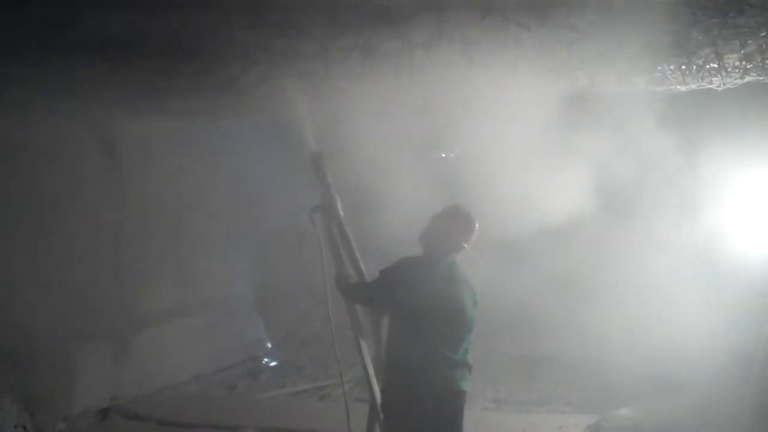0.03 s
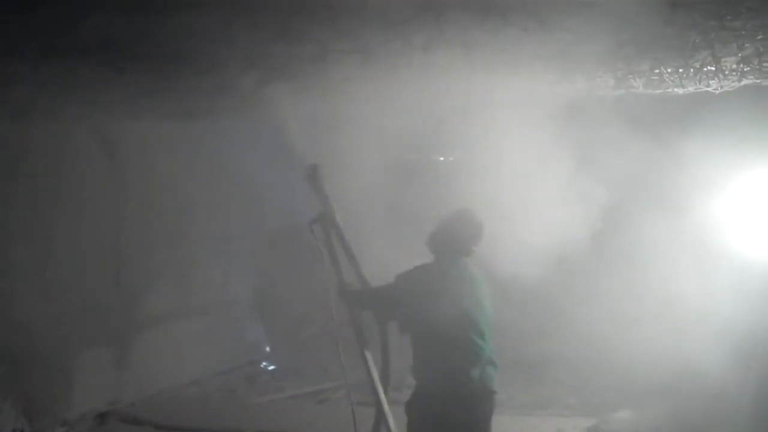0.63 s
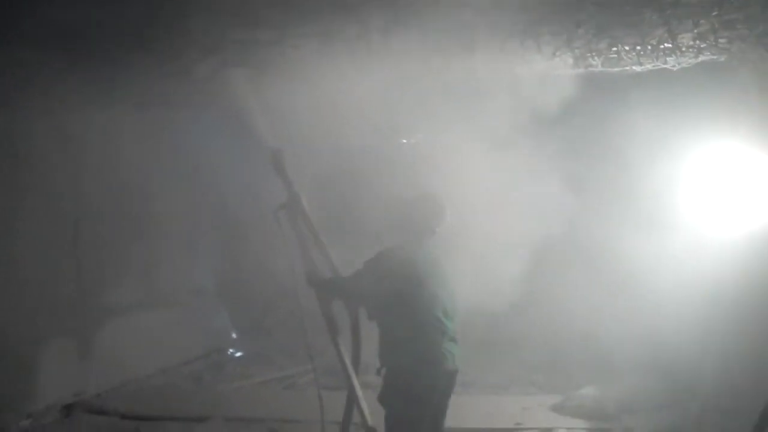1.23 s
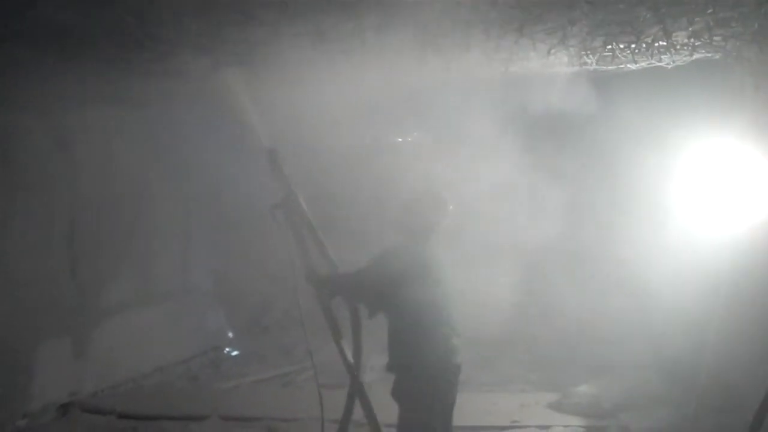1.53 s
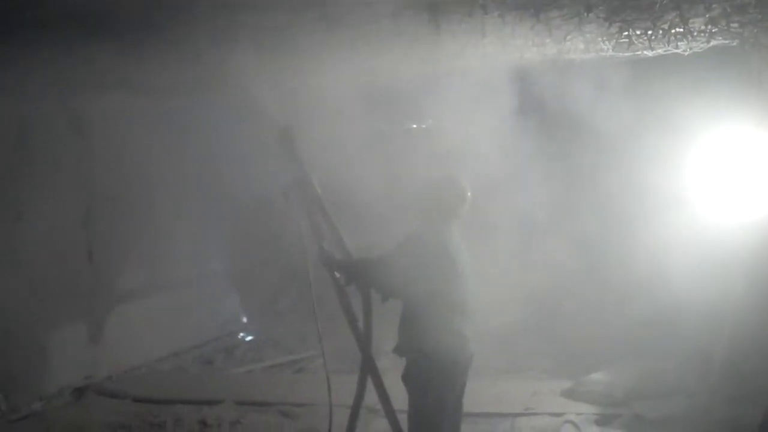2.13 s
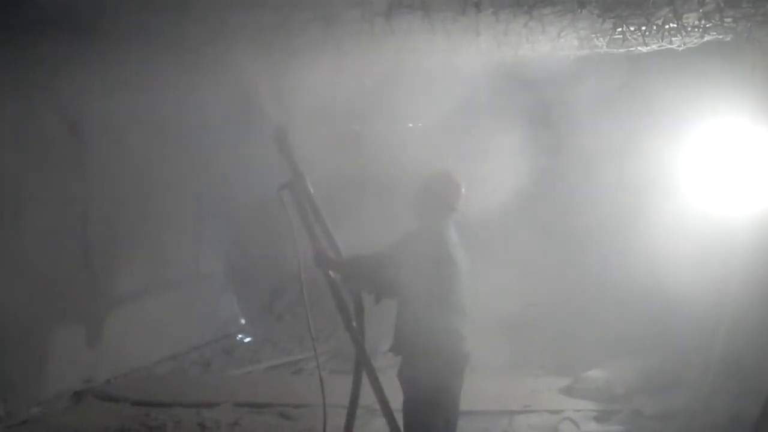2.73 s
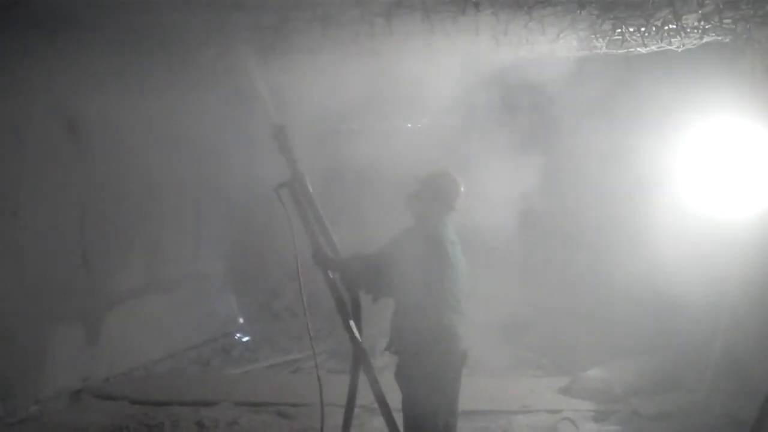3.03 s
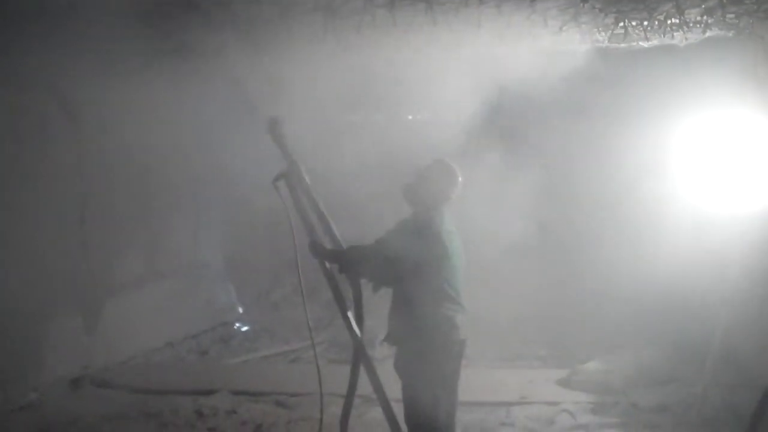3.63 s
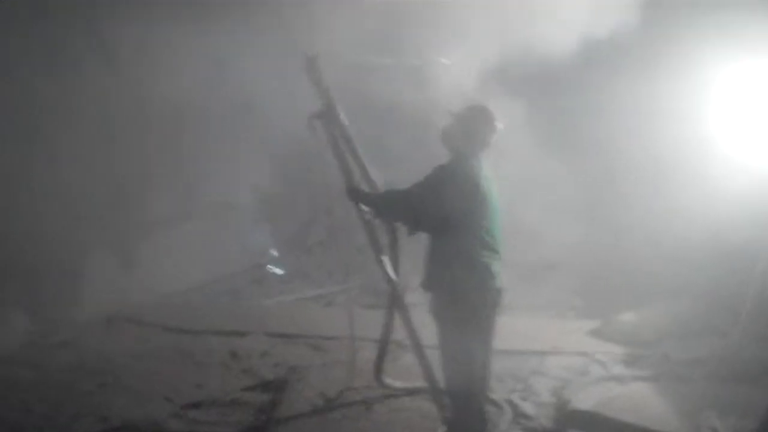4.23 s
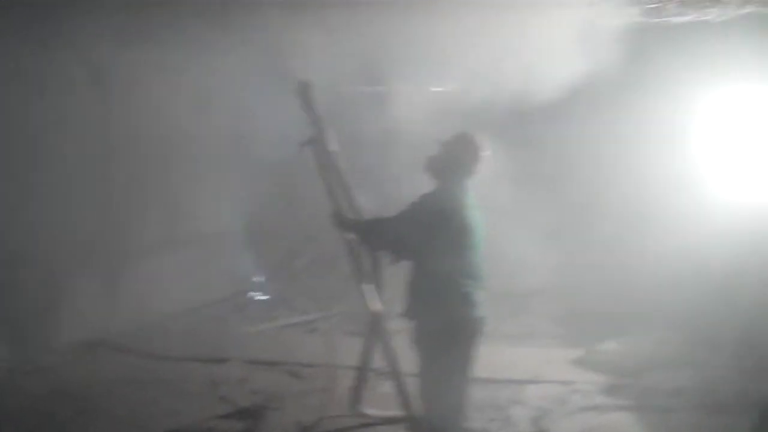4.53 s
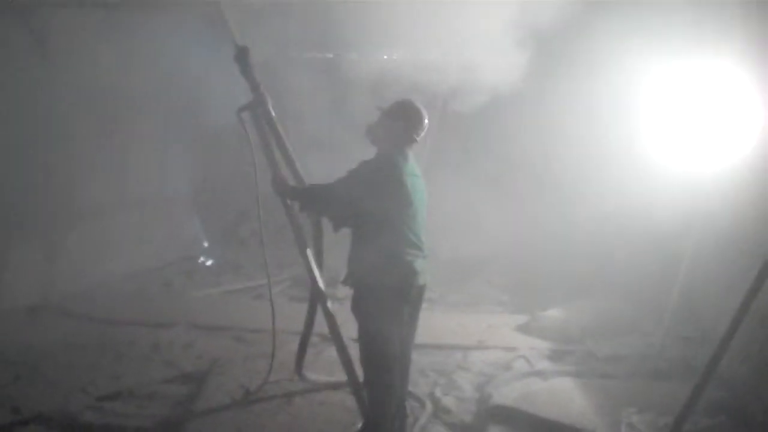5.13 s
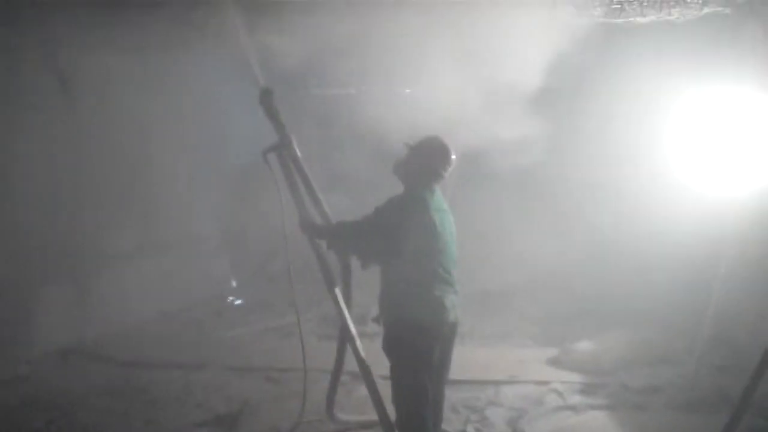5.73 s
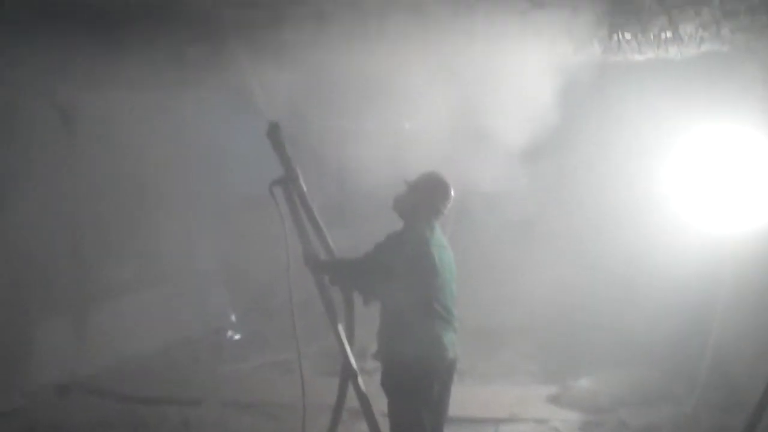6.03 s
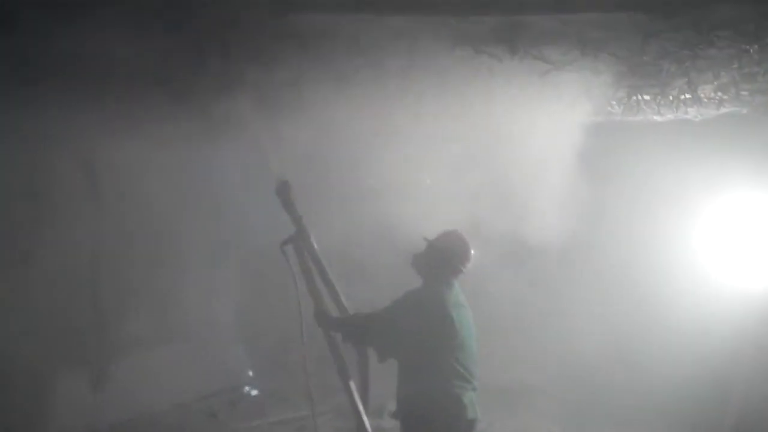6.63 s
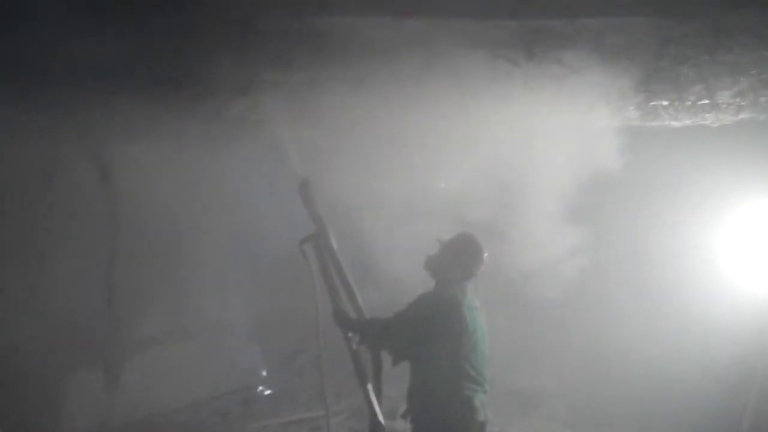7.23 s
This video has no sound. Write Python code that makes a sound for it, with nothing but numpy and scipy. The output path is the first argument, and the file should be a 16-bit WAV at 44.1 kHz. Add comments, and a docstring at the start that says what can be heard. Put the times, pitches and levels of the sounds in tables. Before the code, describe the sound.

A compressed-air nozzle sprays wet concrete inside a rock tunnel, making a loud, unbroken roar and hiss. The jet surges unevenly and spits now and then, and its hollow tone shifts four times as the nozzle is aimed anew. Splatter and fine grit pepper the roof while the tunnel booms behind. The stereo microphones are close, briefly ruffled by a faint draught early on.

```python
"""Spraying concrete in a tunnel

Inside a rock tunnel, a stereo pair stands near enough to hear grit pepper the roof as a worker
sprays wet concrete from a compressed-air lance. The jet roars and surges as the mix comes through
unevenly, and its hollow colour shifts each time the lance is aimed anew. The tunnel booms behind it,
and a draught briefly ruffles the microphones."""
import sys
import numpy as np
from scipy import signal
from scipy.fft import rfft, irfft, next_fast_len
from scipy.io import wavfile
from scipy.ndimage import uniform_filter1d, map_coordinates

SR = 44100
rng = np.random.default_rng(int(sys.argv[2]) if len(sys.argv) > 2 else 0)


def wav_record(signal):
    """Record a signal, one row per channel, as 16-bit PCM in the file named by sys.argv[1]."""
    frames = np.transpose(np.atleast_2d(signal))
    bounded = np.clip(frames, -1, 1)
    # unit amplitude maps onto the largest positive 16-bit level
    quanta = np.round(bounded * 32767).astype(np.int16)
    wavfile.write(sys.argv[1], SR, quanta)


N = 330309
TIME = np.arange(N) / SR
FFT_SIZE = next_fast_len(N + 8192)
FREQ = np.fft.rfftfreq(FFT_SIZE, 1 / SR)

# each layer's spectrum at the microphones: (frequency [Hz], relative density [dB])
DRAUGHT_SPECTRUM = [(15, -5), (35, 0), (65, 2), (100, -9), (250, -41)]
BOOM_SPECTRUM = [(25, -8), (60, -17), (90, -9.5), (130, -5), (170, -5), (250, -3), (320, -1.5), (390, -2),
                 (460, -1), (560, -3.5), (800, -14), (1500, -43)]
SPLASH_SPECTRUM = [(300, -22.5), (560, -2), (750, 0), (900, 0.5), (1100, 0.5), (1400, 2), (1700, -1),
                   (2600, -8), (5000, -33.5)]
HISS_SPECTRUM = [(2500, -24), (4000, 1.5), (5200, 0.5), (6500, -1), (8000, -4.5), (10000, -9.5),
                 (11200, -15), (12200, -22.5), (14000, -63)]
ROAR_SPECTRUM = [(600, -26.5), (1100, -17), (1700, -2.5), (2500, -1.5), (3300, -1.64), (4700, -7),
                 (5500, -9.5), (6500, -20.5), (10000, -46)]
# gusts of displaced air: (peak time [s], length [s], rise [dB])
GUSTS = [(.3, .5, 4), (1.45, 0.56, 9), (2.0, .4, 13)]
# resonances of the tunnel and its roof: (frequency [Hz], width [Hz], relative strength [dB])
ROCK_MODES = [(184, 31, 0.5), (256, 51, 3.0), (474, 102, 3.5), (655, 130, 2.0), (741, 50, 6.0),
              (819, 91, 7.0), (965, 90, 8.5), (1061, 83, 9.0), (1147, 120, 6.5), (1271, 96, 7.5),
              (1341, 103, 7.5), (1448, 55, 2.5), (1729, 53, 1.0)]
# resonances between nozzle and rock, by aim: (frequency [Hz], width [Hz], relative strength [dB])
AIM_1_MODES = [(1476, 117, 4.5), (1580, 170, 4.5), (1750, 110, 6.0), (1960, 220, 2.5), (2238, 44, 3.5),
               (2639, 145, 4.5), (2986, 170, 4.0), (3430, 100, 6.0), (3686, 170, -0.5), (4178, 117, 3.0)]
AIM_2_MODES = [(1578, 75, 3.5), (1901, 65, 7.0), (2074, 170, -1.0), (2295, 170, 1.5), (2375, 25, 3.5),
               (2579, 112, 7.5), (2945, 149, 2.0), (3305, 101, 1.0), (3553, 33, 6.5), (4107, 87, 3.5)]
AIM_3_MODES = [(1565, 124, 4.0), (1899, 70, 6.5), (2107, 160, 2.0), (2247, 60, 3.5), (2333, 57, 3.0),
               (2561, 170, 6.5), (2912, 144, 4.5), (3030, 25, 2.0), (3280, 64, 3.5), (3708, 84, 0.5),
               (4088, 88, 0.5)]
AIM_4_MODES = [(1523, 64, 9.5), (1589, 116, 8.5), (1885, 98, 5.0), (1996, 170, 7.0), (2272, 119, 7.5),
               (2518, 158, 0.0), (2755, 113, 2.5), (2903, 58, 2.5), (3106, 105, 3.0), (3534, 139, 2.0),
               (3821, 119, 5.0)]
AIM_5_MODES = [(1527, 27, 12.0), (1599, 170, 6.0), (1971, 133, 4.5), (2282, 54, 3.5), (2486, 107, 7.5),
               (2785, 67, 5.0), (2895, 128, 2.0), (3286, 25, 2.0), (3689, 93, -1.5), (4004, 110, 0.0)]
# the middle of each swing of the lance to its next aim: (time [s])
SWING_TIMES = [1.6, 3.1, 4.58, 6.12]
# slow rise and fall of the mix through the hose: (time [s], flow [dB])
HOSE_FLOW = [(0.0, 0.5), (0.3, -0.5), (0.75, -1.0), (1.1, -2.5), (1.4, -2.7), (1.65, 3), (2.2, 3.5),
             (2.65, 0.5), (3.1, -1.6), (3.4, 1.2), (4.05, -1.2), (4.6, 1), (5.25, -0.5), (5.5, 2.7),
             (5.75, -3), (6.1, -2.5), (6.5, 0.3), (7.49, 0)]
# uneven lumps of air and mix: (peak time [s], length [s], surge at nozzle [dB], surge at roof [dB])
HOSE_SURGES = [(0.113, 0.16, 2.5, 1.7), (0.253, 0.15, 4.9, 4.5), (0.575, 0.25, 4.5, 0.5),
               (0.84, 0.091, 6.5, 3.9), (0.944, 0.11, 5.5, 2.3), (1.166, 0.032, 4, -3), (1.256, 0.18, 5, 1),
               (1.701, 0.045, -0.2, 4), (2.179, 0.16, 1.5, 1), (2.43, 0.06, 2.2, 2.2),
               (2.556, 0.097, 5.5, 3.5), (2.886, 0.28, 4, -0.7), (3.127, 0.063, 4.4, 1.5),
               (3.27, 0.17, 2.6, 3), (3.604, 0.13, 5.5, 2), (3.879, 0.09, 2.3, -2.5), (4.32, 0.22, 3, 3.5),
               (4.436, 0.085, 3.5, 1), (4.523, 0.05, 3.5, 1), (4.66, 0.32, 3.0, 2.5),
               (4.838, 0.22, 3.3, 1.5), (5.08, 0.18, 2.5, 3.5), (5.36, 0.13, 0.6, 2.2),
               (5.613, 0.1, 5.5, 4.5), (5.775, 0.22, 1.5, 0.5), (5.97, 0.45, 2.5, 1.2),
               (6.364, 0.16, 3, 2.5), (6.896, 0.11, 3.5, 1.5), (7.395, 0.12, 2.3, 0)]
# brief starvings of the nozzle: (time [s], length [s], drop in feed [dB])
FEED_GAPS = [(0.426, 0.064, 1.5), (1.1, .1, 2), (1.39, 0.11, 0.5), (2.508, .04, 2.5), (2.73, .07, 1),
             (3.765, .07, 0.5), (4.007, 0.078, 0.5), (5.255, .07, 1)]
# slugs of mix leaving the nozzle: (peak time [s], level [dB], length [s], centre [Hz], half-width [ln Hz])
MIX_SLUGS = [(.84, -22, 0.08, 4200, 0.27), (.928, -19.5, 0.063, 4850, 0.35), (2.13, -28, .16, 3200, .3),
             (2.552, -20, .04, 2920, 0.7), (2.864, -20.5, .1, 2220, 0.11), (3.607, -26, 0.046, 3600, 0.6),
             (6.878, -26, 0.097, 2500, 0.1)]
# how alike the two microphones sound: (frequency [Hz], coherence [0-1])
PAIR_COHERENCE = [(30, .33), (70, .55), (140, .98), (400, .975), (700, .92), (1200, .84), (2000, .76),
                  (3100, .71), (5000, .43), (8000, .35), (13000, .3)]
# phase across the pair: (frequency [Hz], lead of left [rad])
PAIR_LEAD = [(2000, 0), (3700, -0.8), (5200, 1.14), (6600, 1.5), (8700, 1.24), (12000, 2.5)]
# balance across the pair: (frequency [Hz], left minus right [dB])
PAIR_BALANCE = [(100, -1.9), (450, -2.6), (850, -2.5), (1000, -1), (1400, -2.3), (2000, -1.5), (3200, -1.3),
                (5000, -2.5), (7000, -4.2), (9000, -7.5), (10500, -9), (12500, 0)]


def amp(db):
    """Decibels to gain."""
    return 10 ** (np.asarray(db) / 20)


def unit(x):
    """Scale to rms 1."""
    return x / np.sqrt(np.mean(x ** 2) + 1e-20)


def along(points):
    """Join (frequency [Hz], value) points on a log frequency axis."""
    hz, value = np.transpose(points)
    return np.interp(np.log(FREQ + 1), np.log(hz), value)


def filtered(x, response):
    """Apply a frequency response to x."""
    return irfft(rfft(x, FFT_SIZE) * response, FFT_SIZE)[..., :N]


def wobble(per_s):
    """A smooth random curve with per_s knots a second."""
    return map_coordinates(rng.standard_normal(int(N * per_s / SR) + 4), [TIME * per_s])


def swell(peak_s, length_s, attack_share=0.42, squareness=2.2):
    """A bell-like hump of height 1 that rises faster than it falls."""
    offset = (TIME - peak_s) / length_s
    share = np.where(offset < 0, attack_share, 1 - attack_share)
    return np.exp(-np.abs(offset / share) ** squareness)


def turbulence(patchy_db):
    """Two noises whose narrow bands swell and fade as eddies pass."""
    bands = signal.stft(rng.standard_normal((2, N)), nperseg=1024)[2]
    eddies = uniform_filter1d(rng.standard_normal(bands.shape[1:]), size=2, axis=0)  # across frequency
    eddies = uniform_filter1d(eddies, size=24, axis=1)  # across time
    return signal.istft(bands * amp(patchy_db * unit(eddies)), nperseg=1024)[1][:, :N]


def ringing(modes, ring_db):
    """Gain of resonances that stand above a flat bed."""
    peaks = sum(amp(db + ring_db) ** 2 / (1 + (2 * (FREQ - hz) / width) ** 2) ** 2
                for hz, width, db in modes)
    return np.sqrt(1 + peaks)


def walls(t60_s, wet_db):
    """Direct sound plus dense wall echoes, heard as a fine ripple on the spectrum."""
    tail = rng.standard_normal(N) * amp(-60 * TIME / t60_s)
    return np.abs(1 + amp(wet_db) * rfft(tail / np.linalg.norm(tail), FFT_SIZE))


def at_mics(noises, colour):
    """Colour two unrelated signals and spread them over the pair, at rms 1."""
    spread = np.arccos(np.clip(along(PAIR_COHERENCE), -1, 1)) / 2
    mid, side = filtered(noises, colour * np.array([np.cos(spread), np.sin(spread)]))
    return unit(np.array([mid + side, mid - side]))


def hose_feed():
    """What the hose delivers, in dB: slow flow, surges and gaps at the nozzle, surges at the roof."""
    flow_db = np.interp(TIME, *np.transpose(HOSE_FLOW))
    nozzle_db = sum(db * swell(s, length) for s, length, db, _ in HOSE_SURGES)
    landing_db = sum(db * swell(s, length) for s, length, _, db in HOSE_SURGES)
    starved_db = sum(db * swell(s, length) for s, length, db in FEED_GAPS)
    return flow_db, nozzle_db - starved_db, landing_db


def draught():
    """Displaced air ruffles the microphones, harder in gusts."""
    gust_db = sum(db * swell(s, length) for s, length, db in GUSTS)
    flutter_db = 1.5 * wobble(per_s=11)
    rumble = at_mics(turbulence(patchy_db=3.5), amp(along(DRAUGHT_SPECTRUM)))
    return amp(-55 + gust_db + flutter_db) * rumble


def tunnel_boom(flow_db, surge_db):
    """All around the pair, the tunnel booms with the spray."""
    colour = amp(along(BOOM_SPECTRUM)) * ringing(ROCK_MODES, ring_db=-0.5)
    boom = at_mics(turbulence(patchy_db=1.5), colour)
    return amp(-36 + flow_db + 0.44 * surge_db) * boom


def roof_splash(flow_db, surge_db):
    """Overhead, the mix lands on the rock in clots, with countless ticks of grit."""
    colour = amp(along(SPLASH_SPECTRUM)) * ringing(ROCK_MODES, ring_db=-2.5)
    splash = at_mics(turbulence(patchy_db=1), colour * walls(t60_s=0.76, wet_db=-2.5))
    ticks = rng.standard_normal((2, N)) * (rng.random(N) < 1200 / SR)  # about 1200 a second
    grit = at_mics(ticks, amp(along(ROAR_SPECTRUM)) + amp(along(HISS_SPECTRUM) - 14))
    clots_db = 0.96 * wobble(per_s=30)
    return amp(-25.5 + 0.6 * flow_db + 0.71 * surge_db + clots_db) * (splash + amp(-11.5) * grit)


def slugs(top_hz=10700):
    """Slugs of mix clear the nozzle, each a quick spit of noise that dies more slowly."""
    spits = np.zeros((2, N))
    lowpass = 1 / np.sqrt(1 + (FREQ / top_hz) ** 24)
    for peak_s, db, length, hz, width in MIX_SLUGS:
        age = np.maximum(1 + 2 * (TIME - peak_s) / length, 0)  # 0 at the onset, 1 at the peak
        envelope = (age * np.exp(1 - age)) ** 2
        band = 1 / np.sqrt(1 + (np.log((FREQ + 1) / hz) / width) ** 6)
        spits += amp(db) * envelope * at_mics(rng.standard_normal((2, N)), band * lowpass)
    return spits


def jet(flow_db, surge_db, swing_s=0.28):
    """Air tears out of the nozzle; each aim of the lance has its own resonances and wall colour."""
    air = turbulence(patchy_db=1.82)
    colours = [ringing(ROCK_MODES + modes, ring_db=1.0) * walls(t60_s=0.49, wet_db=-5.5)
               for modes in (AIM_1_MODES, AIM_2_MODES, AIM_3_MODES, AIM_4_MODES, AIM_5_MODES)]
    roar, *later_roars = [at_mics(air, amp(along(ROAR_SPECTRUM)) * colour) for colour in colours]
    for s, next_roar in zip(SWING_TIMES, later_roars):
        swung = np.clip(0.5 + (TIME - s) / swing_s, 0, 1)
        roar = (1 - swung) * roar + swung * next_roar
    hiss = at_mics(turbulence(patchy_db=1), amp(along(HISS_SPECTRUM)) * walls(t60_s=0.62, wet_db=-8))
    roar *= amp(-20.5 + 0.55 * flow_db + 0.97 * surge_db)
    hiss *= amp(-29 + 0.7 * flow_db + 0.54 * surge_db)
    sputter_db = 0.39 * wobble(per_s=24)  # the feed is never quite even
    return amp(sputter_db) * (roar + hiss)


def scene():
    """One feed drives the jet, the splash on the roof and the boom of the tunnel."""
    flow_db, nozzle_db, landing_db = hose_feed()
    lance = jet(flow_db, nozzle_db) + slugs()
    rock = roof_splash(flow_db, landing_db) + tunnel_boom(flow_db, landing_db)
    return lance + rock + draught()


def record(dry, ceiling=0.95, top_hz=14150):
    """The two microphones differ in level and phase; peaks are rounded off, then the top is cut."""
    tilt = amp(along(PAIR_BALANCE) / 2) * np.exp(0.5j * along(PAIR_LEAD))  # half to each side
    pair = filtered(dry, np.array([tilt, 1 / tilt]))
    rounded = pair / (1 + (pair / ceiling) ** 6) ** (1 / 6)
    return filtered(rounded, FREQ < top_hz)


dry = scene()
out = record(dry)
wav_record(out)
```